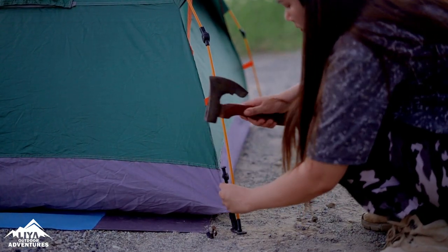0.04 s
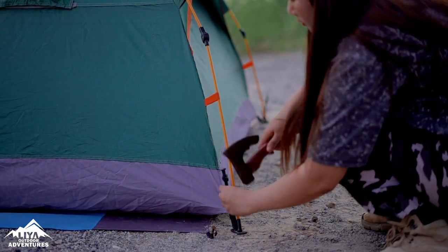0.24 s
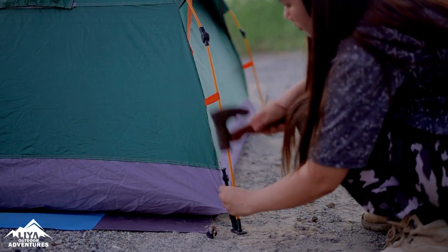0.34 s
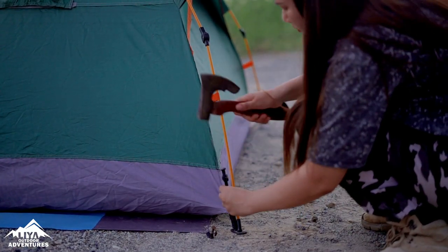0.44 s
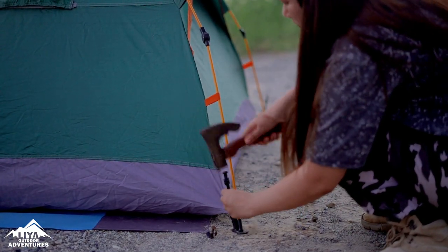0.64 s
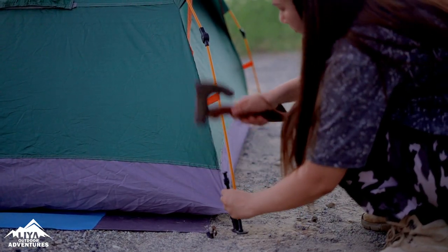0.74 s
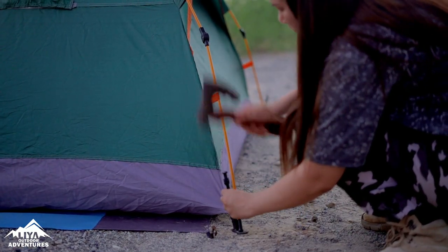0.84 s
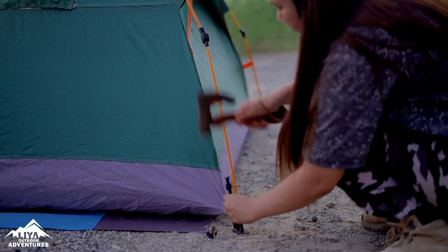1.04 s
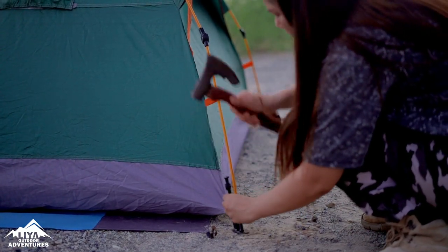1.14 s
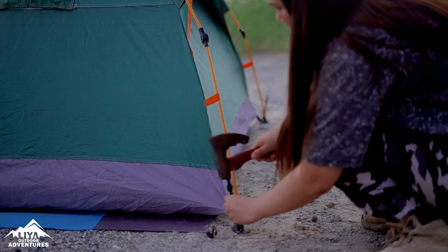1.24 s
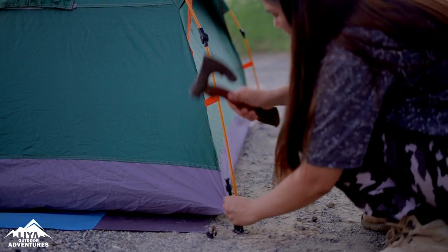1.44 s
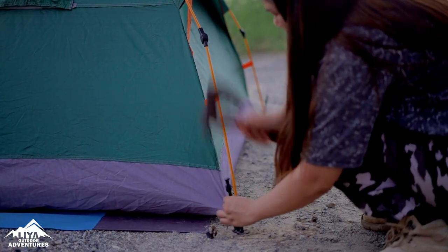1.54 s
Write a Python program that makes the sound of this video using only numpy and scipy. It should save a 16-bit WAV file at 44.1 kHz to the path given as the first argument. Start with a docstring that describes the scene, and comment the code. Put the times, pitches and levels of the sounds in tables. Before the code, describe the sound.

Four hard steel-on-steel clinks drive a tent peg into gravel at a steady pace, close and clipped, while a nearby bird chirps and rasps, a fainter one chips, and a low drone lies under quiet outdoor air.

```python
"""Gravel ground in the open air: the back of a hatchet drives a metal tent stake with four sharp blows.
Decaying modes and noise bursts make each blow; they overload the microphone, and the gravel soon stops the ping.
The hatchet head sings on in steady sines as it rebounds, and bursts of noise tick like shifting gravel.
A bird nearby whistles in gliding sines with noisy rasps; a fainter one chips.
Behind them lie a low wavering drone, soft noise bumps at the microphone and the shaped noise of open air."""
import sys
import numpy as np
from scipy import signal
from scipy.fft import rfft, irfft
from scipy.io import wavfile
from scipy.ndimage import uniform_filter1d

SR = 44100
rng = np.random.default_rng(int(sys.argv[2]) if len(sys.argv) > 2 else 0)


def digitize_waveform(pressure):
    """Quantize a signal to 16-bit integers and store it at the path in sys.argv[1].

    Rows of a 2-D input are taken as channels; values are limited to [-1, 1].
    """
    field = np.atleast_2d(pressure).T
    bounded = np.clip(field, -1, 1)
    quanta = np.round(bounded * 32767).astype(np.int16)
    wavfile.write(sys.argv[1], SR, quanta)


N = 70560  # samples, 1.6 s

# Levels in the tables add to the matching level settings; noise spectra are relative.

# Blows on the stake: (time [s], strength [dB], main ping [Hz], its t60 [s], upper ping [Hz],
# upper ping level [dB], ground knock [dB], contact click [dB], head ring [dB], head ring length [s], tail [dB])
BLOW_EVENTS = [(0.2556, -1, 4996, 0.035, 5700, -9, 1.5, -1, -31, 0.02, -26),
               (0.6707, 3, 5000, 0.029, 5590, -0.5, -13, 1, -39.5, 0.048, -28),
               (0.9912, 4, 5088, 0.024, 5600, -1.5, -8.5, 3.5, -32, 0.051, -26.5),
               (1.3271, 2, 5062, 0.025, 5792, 2, -3.5, 3, -33, 0.049, -24.5)]
# Lesser modes of the stake: (frequency [Hz], level [dB], t60 [s])
STAKE_MODES = [(997, -27, 0.021), (1460, -28, 0.028), (2614, -19, 0.016), (3120, -29, 0.0067),
               (3976, -21.5, 0.031), (4440, -1, 0.005), (6316, -6.5, 0.0077), (7050, -27.5, 0.021),
               (8360, -13, 0.0099), (8400, -40, 0.0044), (10960, -39.5, 0.035), (12700, -37, 0.029),
               (16350, -24, 0.0043)]
# Dull knock of the stake in the gravel: (frequency [Hz], level [dB])
KNOCK_SPECTRUM = [(150, -34), (500, -36), (900, -10.5), (1500, -4), (2400, 0), (3500, -3.5), (6000, -6.5),
                  (16000, -44)]
# Click of steel on steel: (frequency [Hz], level [dB])
CLICK_SPECTRUM = [(500, -46), (2500, -8), (4500, 5.5), (6500, 0), (8000, -7), (10000, -4.5), (13000, -22),
                  (16000, -17.5)]
# Modes of the hatchet head: (frequency [Hz], level [dB])
HEAD_MODES = [(8430, -1), (10250, -21), (13400, -31), (15630, -32)]
# Ticks of gravel: (time [s], level [dB])
GRAVEL_TICKS = [(0.1807, -31.5), (1.036, -44)]
# Spectrum of a gravel tick: (frequency [Hz], level [dB])
GRIT_SPECTRUM = [(500, -24), (2000, 2), (6000, 3), (9000, -1), (12000, -10.5), (16000, -1)]
# Phrases of the nearby bird: (pitch waver [share], curve of (time [s], pitch [Hz], level [dB]))
BIRD_PHRASES = [ (0.0317, [(.135, 2300, -48.5), (.18, 3177, -40), (.215, 2760, -41), (.235, 3100, -60)]),
                (0.026, [(.415, 2200, -54), (.436, 2684, -29), (.445, 2385, -33), (.453, 1686, -45),
                (.46, 2250, -32.5), (.467, 3520, -30.5)]), (0.0196, [(.468, 4460, -41.5), (.48, 4180, -40),
                (.502, 3800, -41)]), (0.0059, [(.51, 3540, -27.5), (.53, 3424, -27.5), (.551, 3537, -30),
                (.563, 3980, -31.5), (.585, 3672, -38), (.635, 3520, -45)]), (.01, [(.641, 2000, -53),
                (.655, 2990, -24.5), (.662, 2880, -21), (.673, 2450, -41)]), (0.0077, [(.712, 2520, -43),
                (.724, 2941, -26), (.733, 2855, -23), (.742, 3190, -30), (.755, 3210, -24),
                (.766, 3670, -33), (.778, 3170, -24), (.798, 3170, -21.5), (.821, 3260, -37)]),
                (0.01025, [(.822, 3196, -39), (.836, 3520, -32), (.851, 3550, -30), (.865, 4016, -33),
                (.877, 4110, -36.5), (.888, 3920, -38.5), (.898, 3420, -20.5), (.912, 3330, -26),
                (.921, 3090, -34)]), (.05, [(1.208, 2945, -46), (1.23, 4540, -43), (1.255, 3980, -48),
                (1.272, 4620, -46), (1.305, 4300, -52)])]
# Thin rising chips of a fainter bird: (time [s], start pitch [Hz], level [dB])
BIRD_CHIPS = [(.368, 6000, -49), (.412, 4020, -41.5), (.485, 5880, -49), (.585, 6100, -53),
              (.633, 3660, -45)]
# Raspy notes and faint high hiss among the birds:
# (middle [s], spread [s], centre [Hz], width [Hz], level [dB])
BIRD_RASPS = [(0.342, 0.019, 4120, 970, -31.5), (.33, 0.022, 2250, 850, -42),
              (0.24, 0.062, 3280, 1600, -39.5), (0.019, 0.087, 3300, 1700, -47.5),
              (.919, 0.0056, 2930, 380, -30.5), (0.39, 0.28, 5600, 3300, -53.5)]
# Course of the low drone: (time [s], pitch [Hz], level [dB])
DRONE_COURSE = [(0, 63.17, -35), (.15, 65.6, -34), (.32, 63.64, -32), (0.499, 65.67, -33),
                (0.598, 74.8, -31), (0.721, 62.1, -36), (0.849, 53.6, -36), (1.001, 55.38, -35),
                (1.12, 62.56, -41), (1.22, 69.95, -41.5), (1.398, 63.93, -36), (1.6, 68, -35)]
# Partials of the drone: (multiple of its pitch, level [dB])
DRONE_PARTIALS = [(1, -2), (2, -24), (3, -18.5)]
# Soft bumps of air or cloth on the microphone: (middle [s], spread [s], level [dB])
BUMP_EVENTS = [(.876, 0.018, -29.5), (0.457, 0.033, -41.5), (0.99, 0.052, -35)]
# Spectrum of the bumps: (frequency [Hz], level [dB])
BUMP_SPECTRUM = [(20, 2), (80, -1.5), (200, -3.5), (480, -8.5), (650, -37), (2000, -54), (16000, -80)]
# Open air, as density: (frequency [Hz], level [dB per Hz])
AIR_SPECTRUM = [(15, 6), (30, -20.5), (60, 8), (100, 1.5), (140, -6.5), (200, -9.5), (280, -14),
                (360, -12.5), (600, -17.5), (1200, -23), (2200, -24.5), (3500, -25), (5500, -28.5),
                (8000, -37.5), (12000, -40), (15500, -40), (16200, -60)]
# Air that differs between left and right, as density: (frequency [Hz], level [dB per Hz])
SIDE_SPECTRUM = [(15, 8.5), (60, 6.5), (130, -10), (300, -26.5), (1000, -52.5), (5000, -49), (16000, -53)]
# Scatter from ground and trees: (frequency [Hz], t60 [s])
SCATTER_T60 = [(300, 0.34), (1500, 0.39), (3500, 0.25), (5300, 0.65), (8000, 0.22), (15000, 0.33)]

# Stake in the gravel
PING_DB, UPPER_T60_S = -0.5, 0.017
KNOCK_DB, KNOCK_T60_S, CLICK_DB, CLICK_T60_S = -5.5, 0.014, -1.5, 0.0052
CLANG_HZ, CLANG_WIDTH_HZ, CLANG_DB, CLANG_T60_S = 5470, 670, -18.5, 0.57
# Hatchet head: where its swell peaks (share of ring length), then the ring that lingers
HEAD_PEAK_SHARE, HEAD_AFTER_DB, HEAD_T60_S = 0.92, -13, 0.45
TICK_T60_S = 0.03
# Birds
FLUTTER_DB, OVERTONE_DB, RASP_GRAIN_DB = 2.5, -33, 2.5
CHIP_S, CHIP_RISE_HZ, CHIP_WAVER_SHARE = 0.022, 1044, 0.015
BIRD_WET_DB, BIRD_T60_S = -8, 0.44
# Open air and scatter
AIR_DB, AIR_PATCH_DB, SIDE_DB = -34.5, 2, -48.5
SCATTER_START_S = 0.0057  # middle of the tail's fade-in
# Two overloaded pickups are mixed; the fainter one is early
LEAD_S, EARLY_DB = 0.01742, -14
CEILING, KNEE = 0.96, 9.2  # full scale = 1; a higher knee bends more sharply
EDGE_HZ = 16300


def stake():
    """Each blow clicks, knocks the gravel and rings the stake, whose two main modes beat, with a diffuse clang."""
    out, send = np.zeros(N), np.zeros(N)
    t = np.arange(SR // 2) / SR
    for s, db, ping_hz, ping_t60, upper_hz, upper_db, knock_db, click_db, _, _, tail_db in BLOW_EVENTS:
        main_modes = [(ping_hz, PING_DB, ping_t60), (upper_hz, PING_DB + upper_db, UPPER_T60_S)]
        ring = sum(amp(level) * decay(t, t60) * np.sin(2 * np.pi * hz * t)
                   for hz, level, t60 in main_modes + STAKE_MODES)
        knock = amp(KNOCK_DB + knock_db) * noise(KNOCK_SPECTRUM, size=len(t)) * decay(t, KNOCK_T60_S)
        click = amp(CLICK_DB + click_db) * noise(CLICK_SPECTRUM, size=len(t)) * decay(t, CLICK_T60_S)
        onset = 1 - np.exp(-t / 0.00019)  # time constant in seconds
        blow = amp(db) * ((ring + knock) * onset + click)
        clang = band(CLANG_HZ, CLANG_WIDTH_HZ)[:len(t)] * decay(t, CLANG_T60_S)
        add(out, s, blow + amp(db + tail_db + CLANG_DB) * clang)
        add(send, s, amp(db + tail_db) * (ring + knock))
    return out + scatter(send, SCATTER_T60)


def hatchet():
    """The head's thin modal ring swells and fades as it swings back up, over a fainter lingering ring."""
    out = np.zeros(N)
    t = np.arange(SR // 3) / SR
    ring = sum(amp(level) * np.sin(2 * np.pi * hz * t) for hz, level in HEAD_MODES)
    for s, *_, db, length, _ in BLOW_EVENTS:
        swing = np.exp(-2 * (t / length - HEAD_PEAK_SHARE) ** 2)
        lingering = amp(HEAD_AFTER_DB) * decay(t, HEAD_T60_S)
        add(out, s, amp(db) * (swing + lingering) * ring)
    return out


def grit():
    """Small ticks of shifting gravel: bursts of shaped noise that die away."""
    out = np.zeros(N)
    t = np.arange(2048) / SR
    for s, db in GRAVEL_TICKS:
        add(out, s, amp(db) * noise(GRIT_SPECTRUM, size=len(t)) * decay(t, TICK_T60_S))
    return out


def birds():
    """Gliding, slightly unsteady whistles, thin rising chips and grainy bands of noise for rasps."""
    t, out = np.arange(N) / SR, np.zeros(N)
    chips = [(CHIP_WAVER_SHARE, [(s, hz, db), (s + CHIP_S, hz + CHIP_RISE_HZ, db)])
             for s, hz, db in BIRD_CHIPS]
    for waver, phrase in BIRD_PHRASES + chips:
        s, hz, db = np.transpose(phrase)
        pitch = np.interp(t, s, hz) * (1 + waver * band(0, 597))
        turns = np.cumsum(pitch) / SR
        whistle = np.sin(2 * np.pi * turns) + amp(OVERTONE_DB) * np.sin(2 * np.pi * 2 * turns)
        # each end of the phrase fades over 6.2 ms
        gate = np.clip(np.minimum(t - s[0], s[-1] - t) / 0.0062 + 0.5, 0, 1)
        level = np.interp(t, s, db) + FLUTTER_DB * band(0, 350)
        out += gate * amp(level) * unit(whistle)
    rasps = sum(amp(db) * swell(s, spread) * band(hz, width) for s, spread, hz, width, db in BIRD_RASPS)
    return out + rasps * amp(RASP_GRAIN_DB * band(0, 400))


def drone():
    """A low wavering hum, perhaps a far engine: harmonic sines on one gliding pitch."""
    t = np.arange(N) / SR
    s, hz, db = np.transpose(DRONE_COURSE)
    turns = np.cumsum(np.interp(t, s, hz)) / SR
    hum = sum(amp(level) * np.sin(2 * np.pi * (multiple * turns + rng.random()))
              for multiple, level in DRONE_PARTIALS)
    return amp(np.interp(t, s, db)) * unit(hum)


def bumps():
    """Soft low puffs on the microphone: swells of low noise."""
    return noise(BUMP_SPECTRUM) * sum(amp(db) * swell(s, spread) for s, spread, db in BUMP_EVENTS)


def air():
    """Outdoor rumble and hiss, shaped noise whose level drifts in patches of time and frequency."""
    z = signal.stft(noise(AIR_SPECTRUM), nperseg=1024, noverlap=768)[2]
    patches = uniform_filter1d(rng.standard_normal(z.shape), size=12, axis=0)
    patches = unit(uniform_filter1d(patches, size=14, axis=1))
    drifting = signal.istft(z * amp(AIR_PATCH_DB * patches), nperseg=1024, noverlap=768)[1]
    return amp(AIR_DB) * drifting[:N]


def air_width():
    """Mostly low air noise, in opposite polarity left and right."""
    return amp(SIDE_DB) * noise(SIDE_SPECTRUM) * np.array([[1], [-1]])


def scatter(x, t60_table):
    """A diffuse outdoor tail of noise, each band dying at its own speed."""
    hz, t, z = signal.stft(rng.standard_normal(SR), SR, nperseg=256)
    tail = signal.istft(z * decay(t, read(t60_table, hz)[:, None]), SR, nperseg=256)[1]
    tail *= np.clip(np.arange(len(tail)) / SR / SCATTER_START_S - 0.5, 0, 1)
    return signal.fftconvolve(x, tail / np.linalg.norm(tail))[:N]


def amp(db):
    """Decibels to gain."""
    return 10 ** (np.asarray(db) / 20)


def unit(x):
    """Scales to rms 1."""
    return x / np.sqrt(np.mean(x ** 2) + 1e-20)


def read(points, hz):
    """Reads a table on a log-frequency axis."""
    f, value = np.transpose(points)
    return np.interp(np.log(hz + 1), np.log(f + 1), value)


def add(mix, s, sound):
    """Mixes a sound in at time s."""
    part = mix[max(round(s * SR), 0):][:len(sound)]
    part += sound[:len(part)]


def noise(spectrum, size=N):
    """Noise of rms 1 with the given spectrum."""
    gain = amp(read(spectrum, np.fft.rfftfreq(size, 1 / SR)))
    return unit(irfft(rfft(rng.standard_normal(size)) * gain, size))


def band(centre_hz, width_hz):
    """Noise of rms 1 in a bell-shaped band; at centre 0, a random wander."""
    hz = np.fft.rfftfreq(N, 1 / SR)
    bell = np.exp(-0.5 * ((hz - centre_hz) / (width_hz / 2)) ** 2)
    return unit(irfft(rfft(rng.standard_normal(N)) * bell, N))


def swell(s, spread):
    """A bell-shaped envelope around time s."""
    return np.exp(-0.5 * ((np.arange(N) / SR - s) / spread) ** 2)


def decay(t, t60):
    """Falls 60 dB in t60."""
    return np.exp(-np.log(1000) * t / t60)


def scene():
    """Everything sits in the centre; only the air, mostly its rumble, has a little width."""
    song = birds()
    song = song + amp(BIRD_WET_DB) * scatter(song, [(3000, BIRD_T60_S)])  # one t60 for all bands
    centre = stake() + hatchet() + grit() + song + drone() + bumps() + air()
    return centre + air_width()


def record(dry):
    """Overload flattens the blows, a faint early copy doubles everything, then the band limit."""
    clipped = dry / (1 + abs(dry / CEILING) ** KNEE) ** (1 / KNEE)
    lead = round(LEAD_S * SR)
    early = np.pad(clipped[:, lead:], ((0, 0), (0, lead)))
    mixed = clipped + amp(EARLY_DB) * early
    lowpass = signal.firwin(255, EDGE_HZ, window=("kaiser", 9), fs=SR)
    return signal.oaconvolve(mixed, lowpass[None], "same")


dry = scene()
out = record(dry)
digitize_waveform(out)
```